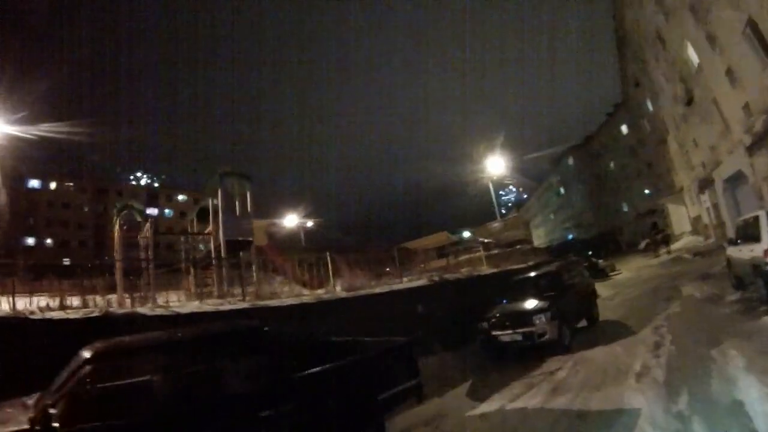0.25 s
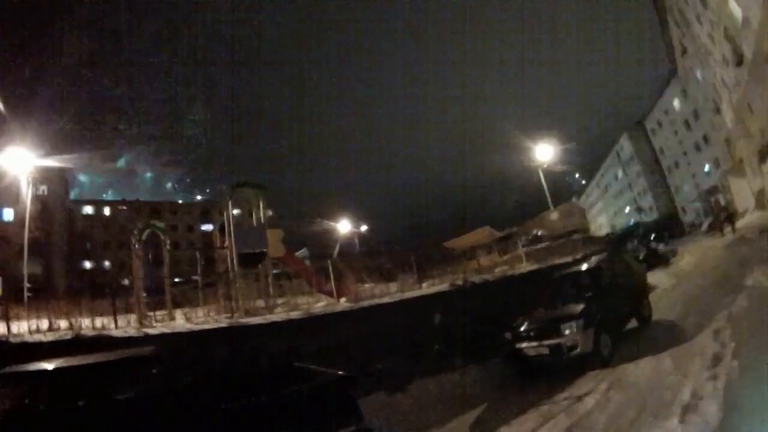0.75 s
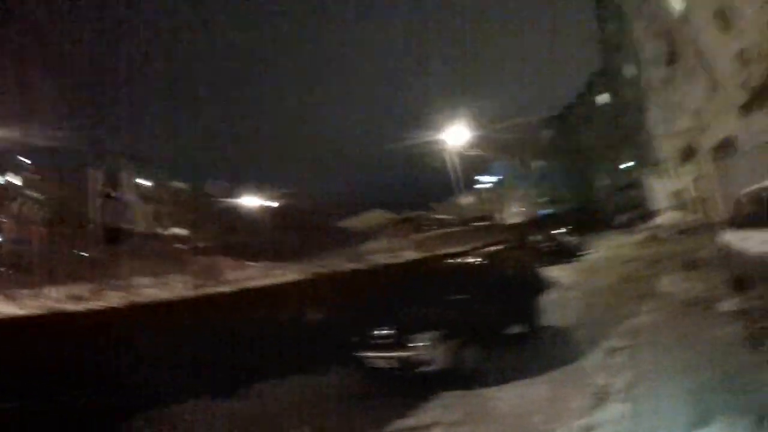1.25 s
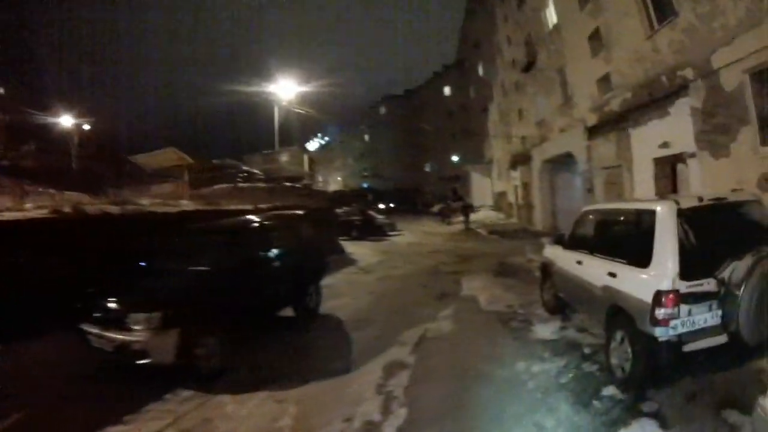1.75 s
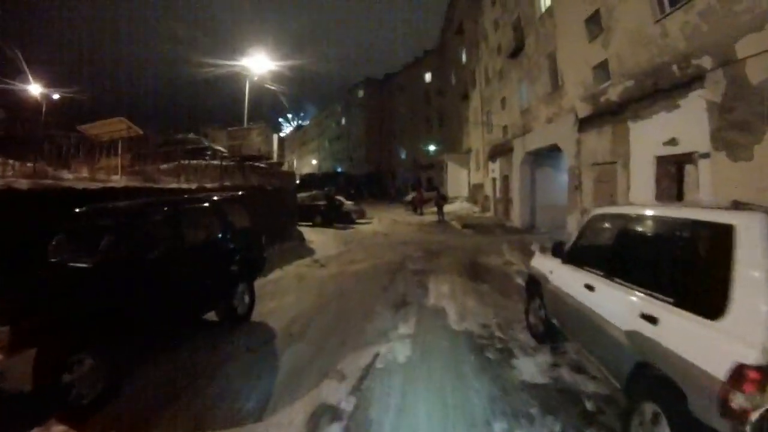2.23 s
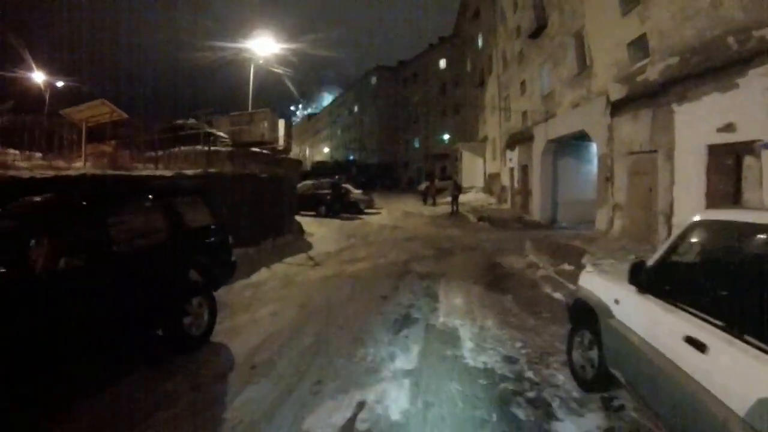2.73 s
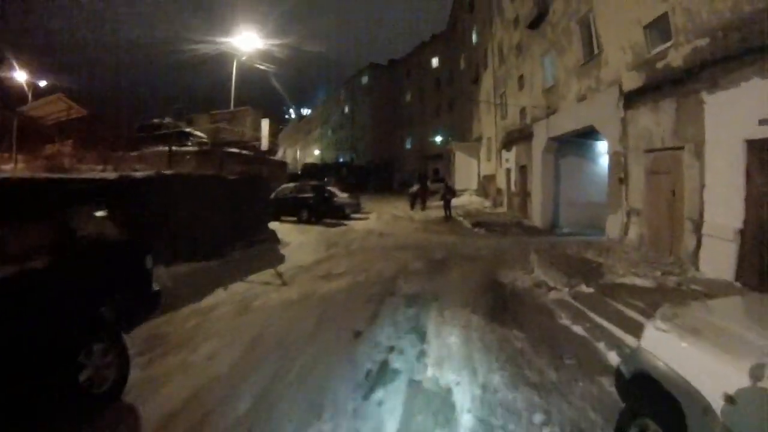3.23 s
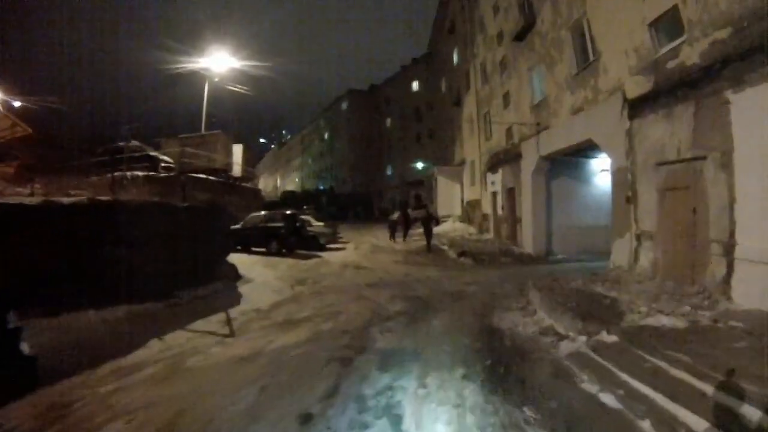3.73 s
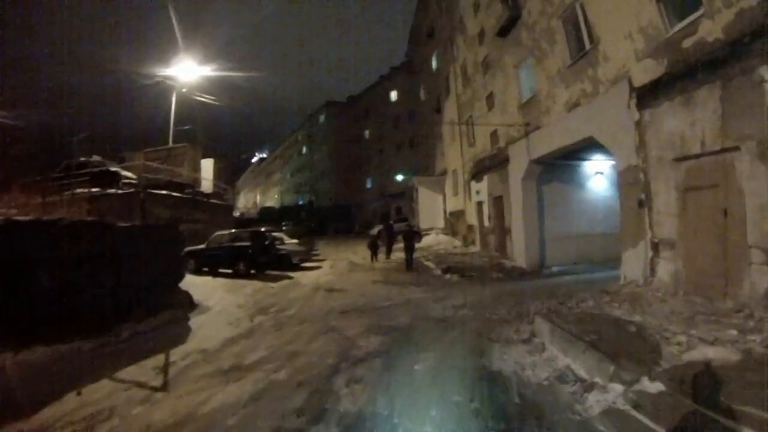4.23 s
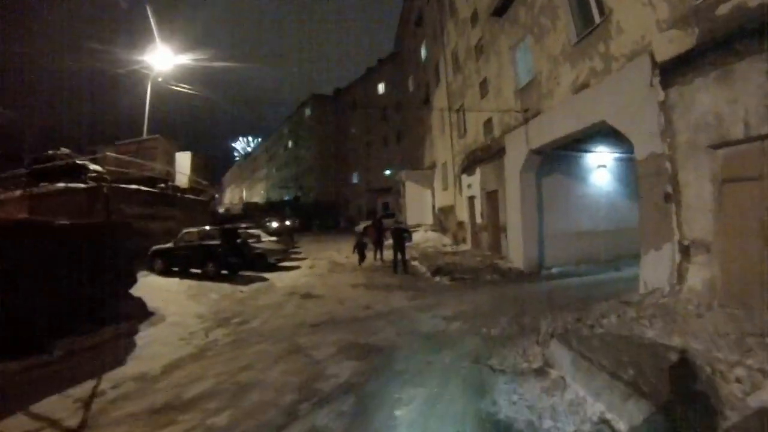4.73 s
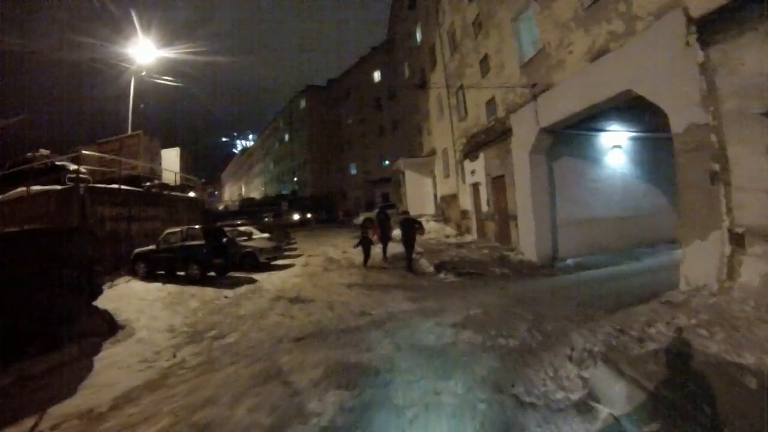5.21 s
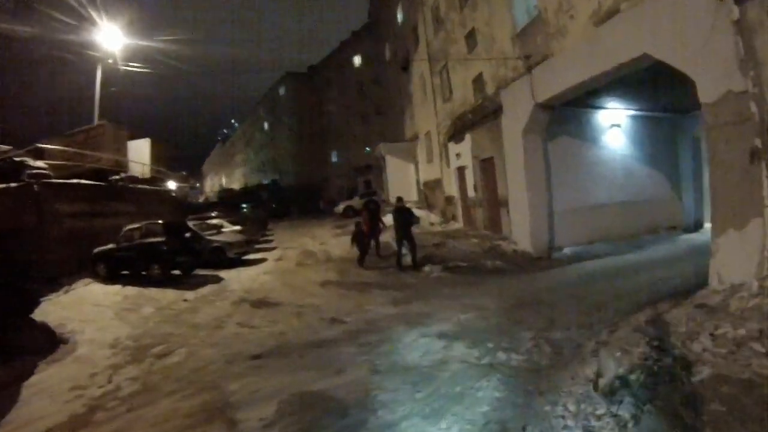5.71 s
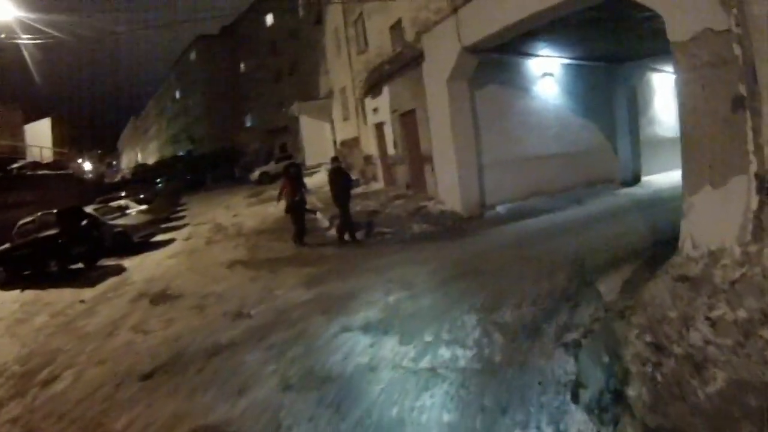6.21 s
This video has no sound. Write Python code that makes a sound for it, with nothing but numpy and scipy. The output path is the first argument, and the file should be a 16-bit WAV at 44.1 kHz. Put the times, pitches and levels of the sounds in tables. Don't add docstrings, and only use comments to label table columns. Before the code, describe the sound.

Outdoors at night between blocks of flats, many fireworks salvos overlap into a lumpy distant roar above low traffic and wind rumble. Crackling stars swell and fade, single stars spit, and near bursts thump irregularly, with ragged wall echoes and short yard reverberation. A freewheel ticks very faintly in brief spells. A small camera in a closed case makes everything boxy and muffled, ringing near 1 kHz.

```python
import sys
import numpy as np
from scipy import signal
from scipy.fft import rfft, irfft
from scipy.io import wavfile
from scipy.ndimage import map_coordinates

SR = 44100
rng = np.random.default_rng(int(sys.argv[2]) if len(sys.argv) > 2 else 0)


def unload_wav(signal):
    wavfile.write(
        sys.argv[1],
        SR,
        np.round(np.clip(np.atleast_2d(signal).T, -1, 1) * 32767).astype(np.int16),
    )


def magnitude_from_level(level_db):
    exponent = np.asarray(level_db, float) / 20
    return 10 ** exponent


N = 284868
ROW = 8192

# time in s, level in dB.
SALVO_LEVELS = [(0, -33.5), (.4, -30), (.9, -26.5), (1.03, -31), (1.6, -31.5), (1.9, -25.5), (2.15, -25),
                (2.5, -28.5), (2.9, -25), (3.08, -21), (3.25, -25.5), (3.6, -28), (4.2, -29), (4.55, -34),
                (5.15, -31), (5.65, -34), (5.85, -31), (6.46, -32.5)]
# frequency in Hz, density in dB per Hz.
ROAR_COLOUR = [(60, -32.5), (130, -6), (250, 3.5), (500, 0.5), (1050, -4), (1500, -20), (2400, -29),
               (3300, -52.5), (6000, -54), (13000, -83), (16000, -120)]
# time in s, level in dB.
RUMBLE_LEVELS = [
    (0.0, -48.5),
    (1.33, -43),
    (2.64, -38.5),
    (6.46, -52),
]
# frequency in Hz, density in dB per Hz.
RUMBLE_COLOUR = [(15, -28.5), (30, 1.5), (70, -2), (130, -2), (250, -42.5), (600, -120)]
# start in s, length in s, level at the start in dB, level at the end in dB.
SHELLS = [(0.025, 0.3, -52.5, -55), (0.357, 0.39, -50, -44), (0.778, 0.11, -46.5, -47.5),
          (.98, 0.29, -61.5, -63.5), (1.3, 0.31, -61.5, -40.5), (1.714, 0.28, -55, -46),
          (2.18, .14, -57.5, -57), (2.352, .18, -48, -39), (2.594, 0.32, -42, -48), (3.05, .2, -45, -54.5),
          (3.32, .09, -56, -51.5), (3.621, 0.599, -48, -38.5), (4.285, 0.24, -49, -58),
          (4.548, 0.48, -63, -58), (5.192, .03, -53, -54), (5.8, .12, -54.5, -45), (5.984, 0.32, -50, -52),
          (6.397, .05, -53, -49)]
# frequency in Hz, density in dB per Hz.
STAR_COLOUR = [(100, -2.5), (400, -6), (1000, 3.5), (1600, -7.5), (2400, -18), (3200, -15), (5200, -22.5),
               (6500, -34), (9000, -42), (12900, -51.5), (13400, -60.5), (16000, -80.5)]
# frequency in Hz, density in dB per Hz.
FIZZ_COLOUR = [(2500, -22), (3200, -2), (5200, -4), (7000, -10.5), (9000, -17), (12900, -22.5),
               (13400, -36), (16000, -70)]
# time in s, peak of the sharp part in dB.
LONE_STARS = [(0.1374, -39.5), (.1817, -39.5), (0.5516, -35), (.659, -34), (1.4, -37.5), (1.4676, -34.5),
              (1.5142, -29), (1.544, -32), (1.918, -28.5), (2.131, -32), (2.1376, -31), (2.3395, -38),
              (2.465, -32), (2.6381, -27.5), (2.673, -29), (2.6966, -30), (2.7785, -26.5), (2.878, -29.5),
              (3.3658, -27), (3.3854, -27), (3.6712, -34.5), (4.0342, -35), (4.0661, -30), (4.2213, -27),
              (4.3413, -31.5), (1.441, -36), (4.7398, -39), (5.047, -42), (5.8978, -34), (6.219, -28.5),
              (0.0763, -40), (.199, -44), (0.2335, -44), (.482, -39), (0.6914, -36.5), (1.033, -46),
               (1.0845, -47.5), (1.0927, -44.5), (1.1713, -48.5), (1.3568, -43), (1.3727, -41),
               (1.3843, -41.5), (1.4217, -41), (1.4874, -40), (1.526, -38.5), (1.5593, -35.5),
               (2.0313, -44.5), (2.3207, -38), (2.823, -36.5), (3.621, -42), (3.648, -35), (4.1563, -34.5),
               (4.4047, -38.5), (4.459, -40.5), (4.494, -40.5), (4.5145, -39.5), (5.917, -37),
               (6.1837, -36.5), (6.3647, -44.5), (6.455, -28)]
# time in s, peak in dB, push in ms, crack in dB.
CLEAN_BURSTS = [(.0851, -5, 0.73, -30), (0.3942, -10, 0.61, -28), (.6759, -1.9, 0.6, -35),
                (0.6856, -7, 1.1, -39), (.697, -3.5, 1.03, -27), (.846, -2.5, 0.71, -25),
                (1.885, -15, 1.8, -31), (1.929, -11, 0.92, -27), (2.1042, -3.5, 0.68, -18),
                (2.109, -14, 2.3, -35), (2.5096, -2.5, 0.8, -22), (2.955, -11, .6, -33),
                (2.9854, -1.9, 0.69, -18), (3.3635, -5, 0.5, -34), (3.6904, -3, 0.98, -26.5),
                (4.2625, -1.4, .73, -22), (4.7615, 1, 0.53, -15), (5.1613, 0.3, 0.58, -21.5),
                (5.9767, -2, .7, -21.5), (6.0254, -15, 0.78, -24), (6.4228, -8.5, 0.72, -30)]
# time in s, peak in dB, push in ms, crack in dB.
WALL_ECHOES = [(0.3169, -8.5, 0.56, -19), (0.3711, -9.5, 1.2, -13.5), (.8745, -2, .63, -13.5),
               (1.6174, -11, 1.86, -9), (1.6417, -2.5, 0.52, -13), (1.651, -11.5, .41, -14),
               (1.8156, -15, 0.59, -30), (1.9111, -6, .77, -24), (1.9158, -11, 1.8, -28),
               (2.0735, -8, 0.98, -16.5), (2.1417, -14.5, 1.1, -22), (2.5275, -14, 0.32, -17),
               (2.876, -3, 0.78, -35), (3.0116, -5.5, 0.61, -8.5), (3.0617, -10.5, 0.92, -8),
               (3.08, -12, 1.15, -25), (3.3479, -3.5, 0.8, -13), (4.289, -3.5, 0.69, -19),
               (4.7914, -8, .74, -26), (4.9705, -3, 0.72, -26), (5.1889, -4.5, 0.72, -10),
               (5.1956, -13, 1.3, -16), (5.6415, -3, 0.83, -25.5), (5.994, -4.5, 0.58, -22),
               (6.1303, -2.5, 0.64, -15.5), (6.1513, -3.5, 0.83, -29), (6.3894, -10, 0.83, -12.5),
               (6.4062, -5.5, .67, -16)]
# time in s, peak in dB, push in ms, crack in dB.
HIDDEN_BURSTS = [(0.3514, -4.5, 0.71, -16), (.3644, -12.5, 0.47, -11), (0.7323, -7.5, 0.87, -15),
                 (.742, -9.5, .78, -15), (.746, -12.5, 1.9, -21), (.7499, -18, 1.2, -24),
                 (.8669, -12, 0.52, -12), (1.6029, -5.5, 0.92, -16), (1.637, -10, 1.14, -16),
                 (1.669, -2, 0.65, -12), (1.9384, -9.5, 0.6, -26), (1.948, -9.5, 0.78, -28),
                 (2.1284, -13, 0.39, -25), (2.2654, -14, 1.54, -30), (2.4983, -6.5, 0.78, -31),
                 (2.5054, -8, 1.14, -30), (2.793, -19, 0.39, -13), (2.8612, -3, 0.77, -35),
                 (3.1486, -9, 0.64, -30), (3.3238, -6.5, 0.5, -15), (3.6981, -7.5, 0.62, -30),
                 (4.7866, -10, .64, -17.5), (5.181, -11.5, .75, -20), (6.0074, -9, .62, -7.5)]
# time in s, peak in dB,
# crack in dB.
FAR_POPS = [(0.0928, -14, -29), (0.4019, -8, -28), (.429, -13.5, -19), (0.5585, -14.5, -25),
            (.7262, -17, -16), (.7564, -13, -25), (.77, -18, -22), (.797, -17, -25), (1.699, -14.5, -10.5),
            (1.821, -10, -32), (1.8297, -15, -29), (1.8794, -17, -20), (1.9592, -17, -28),
            (2.5873, -13.5, -20), (2.6104, -17, -12), (3.035, -9.5, -19), (3.1239, -13, -35),
            (3.3342, -13, -16), (3.3746, -9, -19), (3.58, -13, -31), (3.8363, -18, -13),
            (4.25, -15.5, -5.5), (4.3206, -12.5, -25), (4.8182, -17.5, -16), (5.6539, -14.5, -34),
            (6.0568, -19, -24), (6.1834, -12, -38), (6.2317, -12, -29), (6.2393, -15, -30),
            (6.252, -18, -31)]
# level against the front in dB, t60 of a full-scale front in s.
KIND_TRAILS = [
    (-18, 0.027),
    (-9, 0.034),
    (-3.5, 0.032),
    (-7, 0.019),
]
# frequency in Hz, t60 in s.
YARD_T60 = [(150, 0.53), (1000, 0.34), (5000, 0.24)]
# first click in s, last click in s, first rate per s, last rate per s, level in dB.
RATCHET_SPELLS = [
    (1.22, 1.6, 43.5, 65, -63.5),
    (2.158, 2.42, 54, 54, -65),
    (5.778, 5.98, 45, 45, -68),
]
# frequency in Hz, density in dB per Hz.
RATCHET_COLOUR = [(4000, -40), (7000, -6), (8500, 2), (11000, -4), (13000, -10), (16000, -50)]
# frequency in Hz, density in dB per Hz.
HISS_COLOUR = [(2000, -16), (5000, 1.5), (7000, -7), (8000, -2), (9000, -8), (10000, -3.5), (12800, -17.5),
               (14000, -45)]


def along(points, hz):
    f, v = np.transpose(points)
    return np.interp(np.log(hz + 1), np.log(f + 1), v)


def level_curve(rows):
    s, db = np.transpose(rows)
    return np.interp(np.arange(N) / SR, s, db)


def wobble(rate_hz):
    knots = rng.standard_normal(int(N * rate_hz / SR) + 4)
    return map_coordinates(knots, [np.arange(N) * rate_hz / SR])


def causal(colour):
    cepstrum = irfft(np.log(magnitude_from_level(along(colour, np.fft.rfftfreq(ROW, 1 / SR)))))
    cepstrum[1:ROW // 2] *= 2
    cepstrum[ROW // 2 + 1:] = 0
    return irfft(np.exp(rfft(cepstrum)))[:ROW // 4]


def reports(per_second, spread_db, colour):
    fired = rng.random(N) < per_second / SR
    size_db = spread_db * np.minimum(rng.exponential(size=N), 4)
    shots = fired * magnitude_from_level(size_db) * rng.choice([-1, 1], size=N)
    rattle = signal.fftconvolve(shots, causal(colour))[:N]
    return rattle / np.sqrt(np.mean(rattle ** 2) + 1e-20)


def overlay(at, rows, length):
    index = at + np.arange(rows.shape[1])
    return np.bincount(index.ravel(), rows.ravel(), length)


def roar():
    db = level_curve(SALVO_LEVELS) - 1.6 + 0.3 * wobble(14) + 1.6 * wobble(45)
    return magnitude_from_level(db) * reports(3000, spread_db=0.5, colour=ROAR_COLOUR)


def rumble():
    db = level_curve(RUMBLE_LEVELS) + 0.83 * wobble(10)
    return magnitude_from_level(db) * reports(7300, spread_db=3.0, colour=RUMBLE_COLOUR)


def swells():
    catch_db_per_s, die_db_per_s, far_stars_db = 160, 150, -66
    start_s, length_s, first_db, last_db = np.transpose(SHELLS)[:, :, None]
    t = np.arange(N) / SR - start_s
    burn_db = first_db + (last_db - first_db) * np.clip(t / length_s, 0, 1)
    burn_db += catch_db_per_s * np.minimum(t, 0) - die_db_per_s * np.maximum(t - length_s, 0)
    return np.maximum(burn_db.max(0), far_stars_db)


def crackle(stars_db):
    db = stars_db + 13.0 + 1.07 * wobble(30) + 1.53 * wobble(110)
    return magnitude_from_level(db) * reports(3500, spread_db=3.0, colour=STAR_COLOUR)


def fizz(stars_db):
    full_shell_db, growth = -52, 1.84
    db = full_shell_db + growth * (stars_db - stars_db.max()) + 0.8 * wobble(40)
    return magnitude_from_level(db) * reports(15000, spread_db=2.5, colour=FIZZ_COLOUR)


def snaps(stars_db):
    count, per_second = 600, 90
    centre_hz, pitch_spread, decay_cycles, level_db = 3600, 0.27, 15, 7.5
    at = (rng.random(count) * count / per_second * SR).astype(int)
    hz = centre_hz * np.exp(pitch_spread * rng.standard_normal(count))[:, None]
    t = np.arange(256) / SR
    db = stars_db[np.minimum(at, N - 1)] + level_db + 3.5 * np.minimum(rng.exponential(size=count), 3)
    attack = 1 - np.exp(-(t * hz / 1.2) ** 2)
    rows = magnitude_from_level(db[:, None] - 60 * t * hz / decay_cycles) * np.sin(2 * np.pi * hz * t) * attack
    return overlay(at[:, None], rows, N)[:N]


def lone_stars():
    attack_s, t60_s, lead_s = 0.00042, 0.014, 0.0007
    s, db = np.transpose(LONE_STARS)[:, :, None]
    t = np.arange(512) / SR
    envelope = magnitude_from_level(db + 13.5 - 60 * t / t60_s) * (1 - np.exp(-t / attack_s))
    spit = envelope * rng.standard_normal((len(s), len(t)))
    train = overlay(np.round((s - lead_s) * SR).astype(int), spit, N + SR)[:N]
    colour = causal(STAR_COLOUR)
    return signal.fftconvolve(train, colour / np.linalg.norm(colour))[:N]


def wave(push_s):
    ring_hz, ring_width_hz, ring_db, low_cut_hz = 1050, 450, -4, 165
    f = np.fft.rfftfreq(ROW, 1 / SR)
    w = 2 * np.pi * f * push_s
    rounded = -1j * f / (1 + 1j * w / 2.57) ** 4 * np.exp(-(w / 6.4) ** 2 / 2)
    damping = 1j * f * ring_width_hz
    case = 1 + magnitude_from_level(ring_db) * damping / (ring_hz ** 2 - f * f + damping)
    return rounded * case * (1j * f / (low_cut_hz + 1j * f)) ** 2


def arrivals():
    pop_push_ms, trail_s_per_db = 0.61, 0.002
    pops = [(s, db, pop_push_ms, crack_db) for s, db, crack_db in FAR_POPS]
    fronts = []
    for rows, (trail_db, t60_s) in zip([CLEAN_BURSTS, WALL_ECHOES, HIDDEN_BURSTS, pops], KIND_TRAILS):
        for row in rows:
            fronts.append((*row, trail_db, t60_s - trail_s_per_db * row[1]))
    return fronts


def bursts():
    s, db, push_ms, crack_db, scatter_db, t60_s = np.transpose(arrivals())[:, :, None]
    lead = ROW // 8
    after_s = (np.arange(ROW) - lead) / SR
    noise = rng.standard_normal((3, len(s), ROW))

    body = irfft(wave(push_ms / 1000))
    body /= -body.min(1, keepdims=True)
    shifted = (np.arange(ROW) - lead + body.argmin(1)[:, None]) % ROW
    body = np.take_along_axis(body, shifted, axis=1)

    late_s = np.clip(after_s - 0.0015, 0, None)
    fade = (late_s > 0) * magnitude_from_level(-60 * late_s / np.clip(t60_s, 0.01, 0.15))
    blur = wave(2.0 * push_ms / 1000) + 0.64 * wave(push_ms / 1000)
    scatter = irfft(rfft(noise[0] * fade) * blur)
    scatter /= np.sqrt(np.mean(abs(blur) ** 2, 1, keepdims=True))

    front_s = np.clip(after_s + 0.00055, 0, None)
    sharp = noise[1] * magnitude_from_level(-60 * front_s / 0.0044)
    sparse_trail = magnitude_from_level(-19.5) * noise[2] ** 3 * fade ** 1.52
    spit = (front_s > 0) * (sharp + sparse_trail)
    high_pass = signal.butter(2, 1800, "hp", fs=SR, output="sos")
    treble = signal.sosfilt(high_pass, causal(STAR_COLOUR))
    crack = irfft(rfft(spit) * rfft(treble, ROW))
    crack /= abs(crack).max(1, keepdims=True)

    rows = magnitude_from_level(db) * (body + magnitude_from_level(scatter_db - 1) * scatter + magnitude_from_level(crack_db + 1.5) * crack)
    return overlay(np.round(s * SR).astype(int), rows, N + 2 * ROW)[lead:lead + N]


def yard(x):
    delay = 600
    hz, t, z = signal.stft(rng.standard_normal(SR), SR, nperseg=256)
    decay = magnitude_from_level(-60 * t / along(YARD_T60, hz)[:, None])
    tail = signal.istft(z * decay, SR, nperseg=256)[1]
    return signal.fftconvolve(np.pad(x, (delay, 0)), tail / np.linalg.norm(tail))[:N]


def ratchet():
    t, gate = np.arange(N) / SR, np.zeros(N)
    for first_s, last_s, first_rate, last_rate, db in RATCHET_SPELLS:
        u = np.clip((t - first_s) / (last_s - first_s), 0, 1)
        teeth = (last_s - first_s) * (first_rate * u + (last_rate - first_rate) * u * u / 2)
        clicks = np.exp(2.5 * (np.cos(2 * np.pi * teeth) - 1))
        gate += magnitude_from_level(db) * np.sin(np.pi * u) ** 0.5 * clicks
    return gate * reports(20000, spread_db=-1.0, colour=RATCHET_COLOUR)


def scene():
    stars_db = swells()
    city = roar() + rumble() + crackle(stars_db) + fizz(stars_db) + snaps(stars_db)
    near = lone_stars() + bursts()
    return (city + near + magnitude_from_level(-12.5) * yard(near) + ratchet())[None]


def roll_off(x):
    return signal.sosfilt(signal.butter(12, 15700, fs=SR, output="sos"), x)


def record(dry):
    hardness, top = 12, 1.1
    x = dry + magnitude_from_level(-74) * reports(20000, spread_db=1.0, colour=HISS_COLOUR)
    limited = x / (1 + abs(x / top) ** hardness) ** (1 / hardness)
    return roll_off(limited)


dry = scene()
out = record(dry)
unload_wav(out)
```